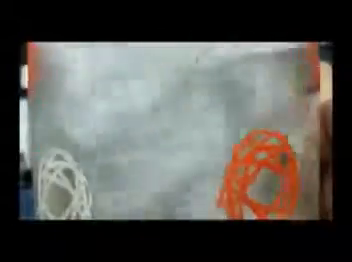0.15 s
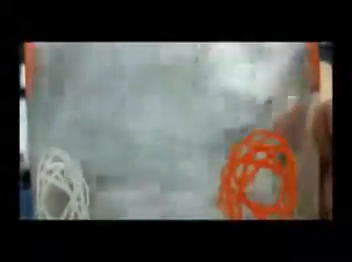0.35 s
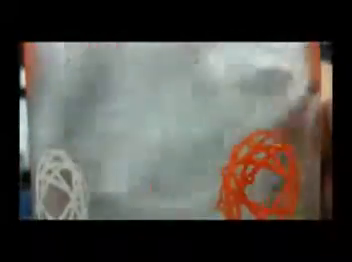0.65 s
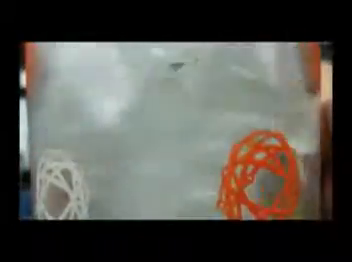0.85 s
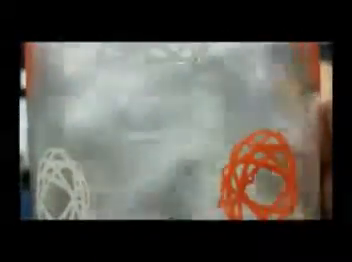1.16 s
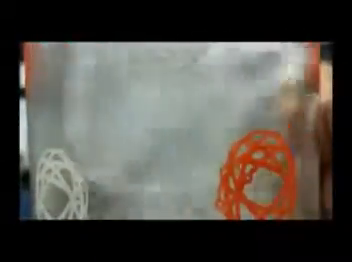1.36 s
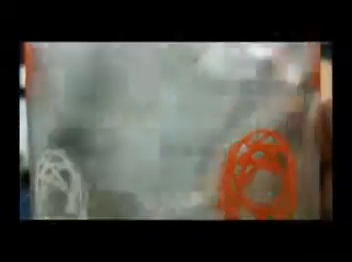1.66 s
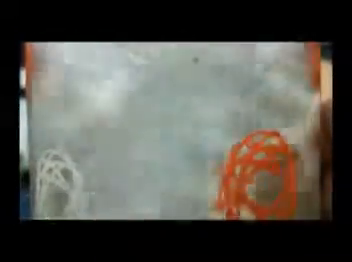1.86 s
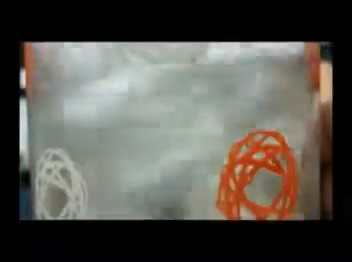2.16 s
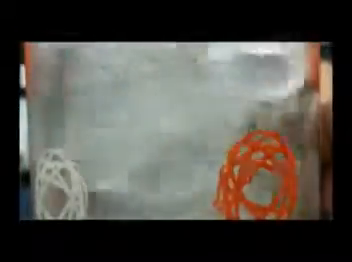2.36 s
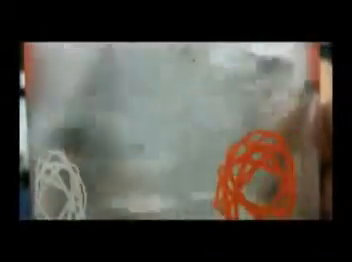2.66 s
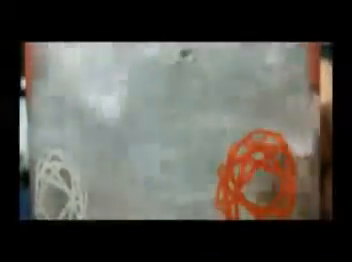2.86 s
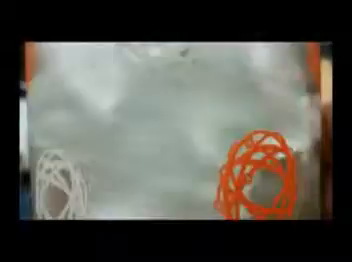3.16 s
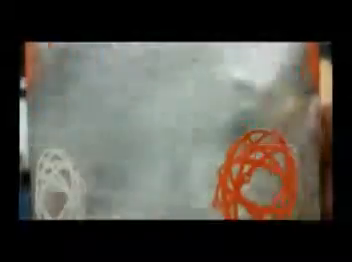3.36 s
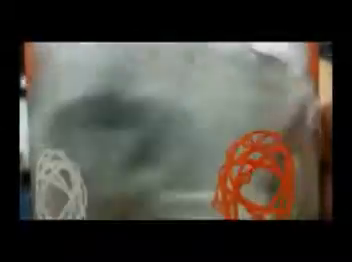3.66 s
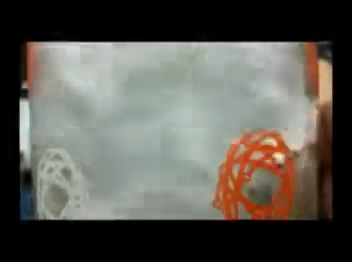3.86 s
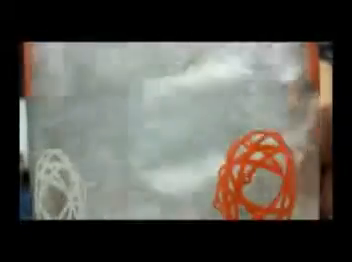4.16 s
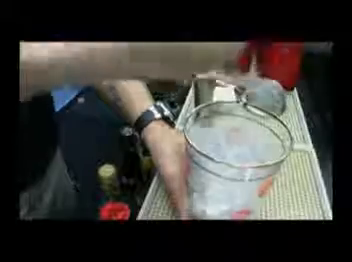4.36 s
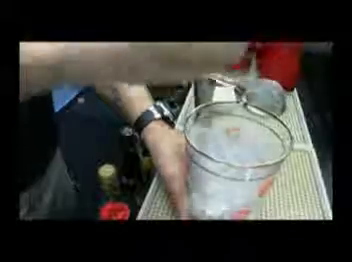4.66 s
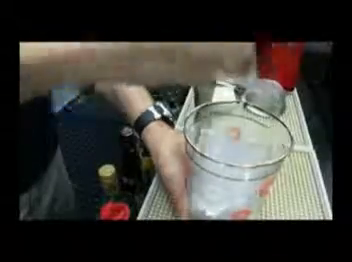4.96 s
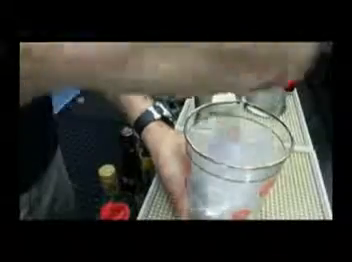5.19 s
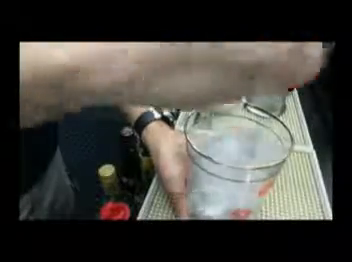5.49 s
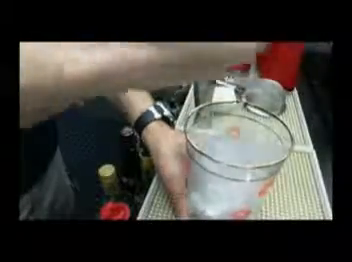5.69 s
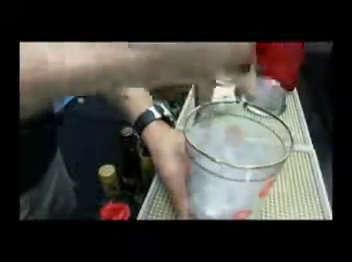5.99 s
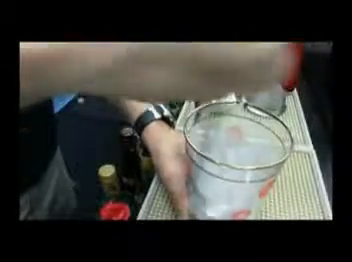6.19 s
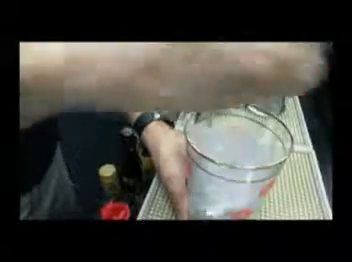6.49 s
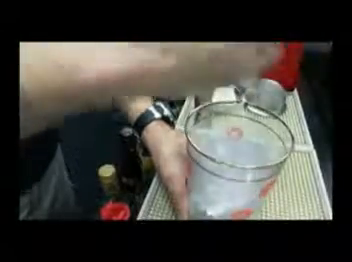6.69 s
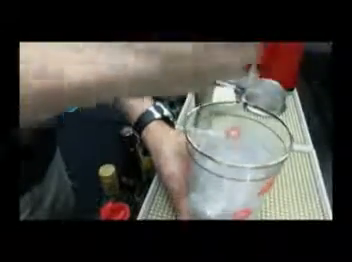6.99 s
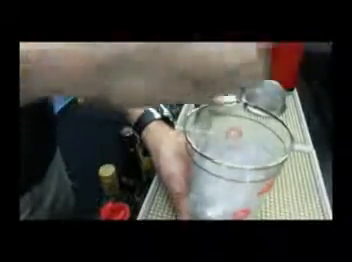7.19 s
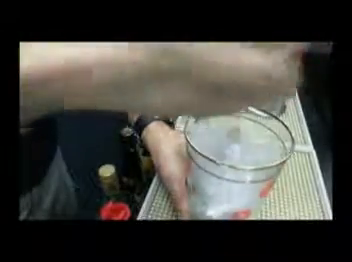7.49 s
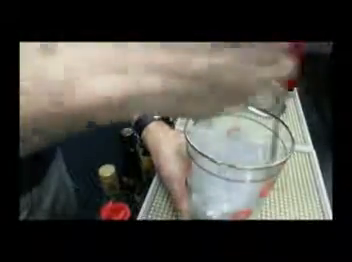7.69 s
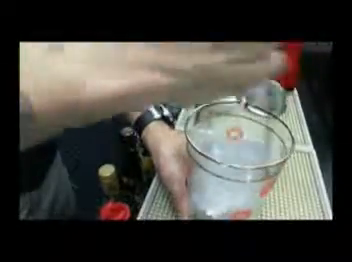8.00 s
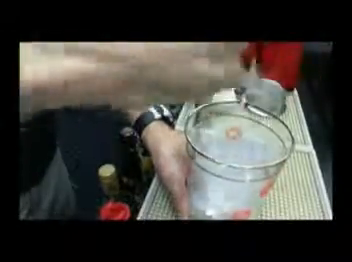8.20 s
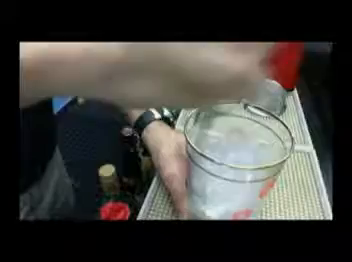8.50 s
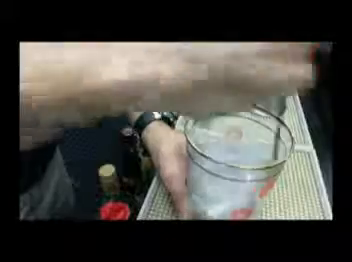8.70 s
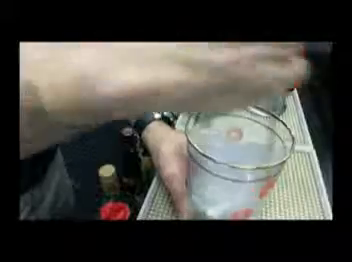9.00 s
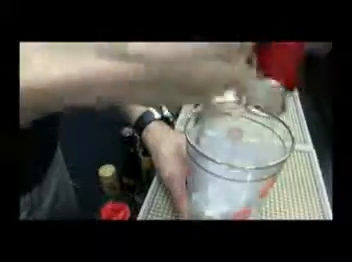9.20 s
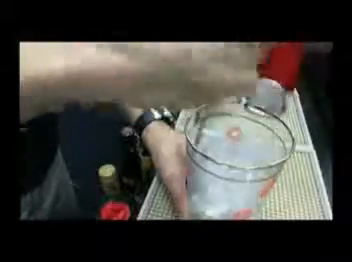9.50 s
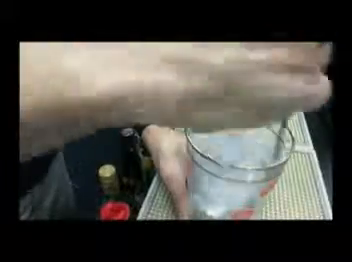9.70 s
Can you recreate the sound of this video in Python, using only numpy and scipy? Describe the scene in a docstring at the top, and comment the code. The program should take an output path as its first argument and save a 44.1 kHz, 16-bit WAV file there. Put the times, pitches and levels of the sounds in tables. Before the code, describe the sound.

A metal bar spoon stirs ice cubes in a tall mixing glass. At first the microphone is right at the glass, and the cubes knock, crack and rattle loudly in uneven surges. After a split-second gap the stirring is heard from above, softer and rounder, with a faint hollow tone from the glass and several bright rings as the spoon hits it. Quiet bar room noise and a deep hum lie behind.

```python
"""Ice cubes knock and jostle as a metal bar spoon stirs them in a tall mixing glass. Each impact excites
damped modes and drives the resonances of the glass: its air hoots and its wall rings. The glass is heard
first right at its wall, where the microphone overloads, and after a short silence from above, where the
spoon now and then strikes it and rings. Behind lie the noise of the bar and a deep hum that comes and goes.
"""
import sys
import numpy as np
from scipy import signal
from scipy.fft import rfft, irfft, next_fast_len
from scipy.io import wavfile

SR = 44100
rng = np.random.default_rng(int(sys.argv[2]) if len(sys.argv) > 2 else 0)


def materialize(psi):
    """Save the field psi as 16-bit PCM at rate SR to the path in sys.argv[1].

    A 1-D psi becomes a single channel; in a 2-D psi each row is a channel.
    """
    bounded = np.clip(np.atleast_2d(psi).T, -1, 1)
    quanta = np.round(bounded * 32767).astype(np.int16)
    wavfile.write(sys.argv[1], SR, quanta)


N = 434385
TIME = np.arange(N) / SR
NEAR_END_S, ABOVE_START_S = 4.257, 4.3155

# loud impacts of a cube on the glass: start_s, body_db, clink_db, pitch_hz
IMPACTS = [(0.014, -22, -7.5, 11000), (0.034, -11, -0.5, 2850), (0.113, -25, -9.5, 4700),
           (0.132, -19, -10, 4500), (0.171, -21, -13, 5640), (0.188, -8.5, 1, 3420), (0.198, -16, -8, 2080),
           (0.233, -27, -18.5, 2480), (0.301, -17.5, -15, 3470), (0.358, -23.5, -8, 12600),
           (0.431, -27, -11, 13000), (0.503, -13, 1.5, 11000), (0.546, -20, -4.5, 8330),
           (0.557, -25, -18, 6850), (0.693, -22.5, -6.5, 11400), (0.742, -21, -9.5, 2540),
           (0.754, -28, -5, 11500), (0.767, -23, -8, 4140), (0.782, -20.5, -14, 4700),
           (0.796, -33, -10, 4200), (0.806, -29, -14, 6100), (0.822, -19, -7.5, 5600),
           (0.836, -37, -13.5, 5360), (0.871, -19.5, -2, 6280), (0.891, -17, -17, 6900),
           (0.943, -25.5, -13.5, 3600), (1.001, -33, -14.5, 2500), (1.106, -13, -13.5, 3000),
           (1.121, -37, -22, 5530), (1.146, -18, -6, 5000), (1.217, -22.5, -5, 11100),
           (1.373, -17.5, -6, 5630), (1.446, -11, -6, 2650), (1.469, -13, -1.5, 4370),
           (1.478, -17, -5, 5700), (1.499, -14.5, -9, 4100), (1.534, -19.5, -5.5, 11150),
           (1.706, -23, -9.5, 5500), (1.715, -18.5, -12, 12900), (1.728, -17, -6.5, 2880),
           (1.739, -27, -11.5, 4360), (1.762, -19, -15, 3100), (1.811, -17.5, -12.5, 2300),
           (1.822, -20, -7, 2600), (1.861, -18, -11.5, 2670), (1.886, -39, -4.5, 2640),
           (1.895, -35, -4, 9460), (1.987, -25, -6, 11260), (2.015, -36, -9, 6000),
           (2.025, -22, -3.5, 5900), (2.039, -34, -2, 6040), (2.056, -15.5, 1, 13000),
           (2.078, -37, -19, 11600), (2.093, -39, -4, 8400), (2.127, -26, -12.5, 2030),
           (2.141, -28, -11.5, 5760), (2.151, -17, -14, 3450), (2.232, -41, -17, 6700),
           (2.309, -23, -6, 13400), (2.372, -23, 2, 8260), (2.385, -23, 2.5, 5540),
           (2.425, -43, -3.5, 9500), (2.459, -27, -12, 2500), (2.538, -22, -4, 11050),
           (2.601, -20.5, -16, 8700), (2.697, -39, -7, 7650), (2.716, -21, 2, 12500),
           (2.734, -17, -0.5, 5240), (2.764, -27, -19, 8500), (2.819, -21, -19.5, 2460),
           (2.893, -21, -25, 2060), (3.020, -27, -11.5, 9600), (3.029, -32, -10, 6700),
           (3.083, -23.5, -16.5, 11100), (3.157, -24, -9.5, 12800), (3.185, -17, -7, 6400),
           (3.194, -37, -15, 5500), (3.223, -27, -14, 7500), (3.352, -18.5, -13.5, 8600),
           (3.393, -27, -13, 8650), (3.410, -14.5, -5.5, 12400), (3.437, -31, -8.5, 4050),
           (3.503, -20, -12.5, 2230), (3.520, -21, -9.5, 5100), (3.618, -21.5, -5, 11300),
           (3.635, -43, -10, 5630), (3.647, -29, -3, 9700), (3.760, -13, -3, 1930),
           (3.777, -11.5, 0.5, 3930), (3.855, -12, 3.5, 5010), (3.911, -25, -18, 3100),
           (3.924, -21, -15, 2800), (3.934, -24, -2, 6320), (3.986, -35, -12, 9340),
           (4.034, -65, -8.5, 10300), (4.086, -28, -4, 9970), (4.095, -22, -9, 8640), (4.119, -13, 0, 5680),
           (4.135, -10.5, -0.5, 2830), (4.181, -17, -1, 12140), (4.202, -14, 1, 5050),
           (4.411, -48, -13, 11740), (4.569, -40, -17, 4400), (4.616, -26.5, -12, 3490),
           (4.674, -52, -14.5, 4540), (4.711, -28, -15.5, 8900), (4.735, -33, -17, 10900),
           (4.797, -37, -20, 4100), (4.868, -39, -18, 4800), (4.930, -44, -17, 2920),
           (4.946, -32, -33, 2800), (4.964, -29, -15, 2050), (4.982, -37, -17.5, 4730),
           (5.049, -27.5, -16.5, 2680), (5.123, -36, -13.5, 5300), (5.240, -21.5, -15.5, 4840),
           (5.254, -19.5, -15, 4600), (5.294, -35, -14, 3750), (5.345, -34, -8.5, 4420),
           (5.369, -26.5, -14, 2350), (5.409, -40, -11.5, 6500), (5.438, -41, -15.5, 2900),
           (5.466, -28, -15.5, 2800), (5.545, -34, -10.5, 4600), (5.588, -24, -12.5, 10600),
           (5.637, -45, -16.5, 6760), (5.740, -55, -16, 6170), (5.827, -32, -16.5, 11900),
           (5.947, -28, -21, 2070), (6.060, -34, -14, 6660), (6.091, -32, -10.5, 5430),
           (6.235, -23, -27, 8600), (6.319, -38, -18, 4420), (6.344, -33, -18, 5300),
           (6.411, -48, -18.5, 2745), (6.577, -21.5, -21, 2020), (6.601, -26, -21, 2780),
           (6.663, -47, -13.5, 4790), (6.748, -38, -15.5, 5400), (6.885, -29.5, -12.5, 5960),
           (7.077, -53, -14.5, 5630), (7.404, -54, -15, 5570), (7.560, -32, -40, 3700),
           (7.706, -36, -17.5, 5500), (7.939, -53, -21, 2360), (8.191, -28.5, -27, 2680),
           (8.309, -29, -27, 6600), (8.413, -34, -20, 7000), (8.828, -25.5, -24, 2420),
           (8.957, -34, -15.5, 2040), (8.994, -35, -16, 9100), (9.048, -27, -11.5, 8600),
           (9.134, -28, -56, 3200), (9.153, -25.5, -14.5, 9400), (9.304, -30, -26, 2090),
           (9.338, -32, -17.5, 7000), (9.354, -48, -16, 8300), (9.638, -55, -19, 3580),
           (9.771, -23, -6.5, 5130), (9.813, -19.5, -19, 5500)]
# spectrum of the ice from above: frequency_hz, level_db
ICE_SPECTRUM_ABOVE = [(100, -1.5), (400, -7.5), (900, -1), (1450, 6.5), (1850, -5), (2400, 12), (3500, 4),
                      (4700, 11), (6700, 5.5), (8200, 11), (10000, 2), (11500, 6.5), (13500, 2),
                      (15500, -21)]


def gain_of(db):
    """Decibels to amplitude ratio."""
    return 10 ** (np.asarray(db) / 20)


def unit_rms(x):
    """Normalisation to an rms of one."""
    return x / np.sqrt(np.mean(x ** 2) + 1e-20)


def value_at(points, hz):
    """Interpolation on a log-frequency axis."""
    f, value = np.transpose(points)
    return np.interp(np.log(hz + 1), np.log(f + 1), value)


def add(mix, start_s, sound):
    """Superposition of a sound on the mix."""
    part = mix[max(round(start_s * SR), 0):][:len(sound)]
    part += sound[:len(part)]


def coloured_noise(spectrum, length=N):
    """Spectral shaping of white noise, at an rms of one."""
    size = next_fast_len(length, True)
    gain = gain_of(value_at(spectrum, np.fft.rfftfreq(size, 1 / SR)))
    return unit_rms(irfft(rfft(rng.standard_normal(length), size) * gain, size)[:length])


def drift(rate_hz):
    """Low-pass noise for slow random modulation."""
    return coloured_noise([(rate_hz / 2, 0), (rate_hz, -6), (10 * rate_hz, -80), (20 * rate_hz, -140)])


def hum(pitch_hz=33.2, waver=0.033, unsteady_db=1.5, rest_db=-43, fade_s=0.068):
    """A deep tone, slightly modulated in amplitude and frequency, swells for a spell and sinks back."""
    # spells of hum: start_s, end_s, level_db
    spells = [(0, 4.85, -33.5), (5.301, 6.35, -28), (6.3, 7.05, -38), (8.13, 9.5, -30.5)]
    swell = sum(gain_of(db) * np.clip(np.minimum(TIME - start, end - TIME) / fade_s, 0, 1)
                for start, end, db in spells)
    envelope = np.maximum(swell, gain_of(rest_db)) * gain_of(unsteady_db * drift(2.5))
    hz = pitch_hz * (1 + waver * drift(3.5))
    return envelope * np.sin(2 * np.pi * np.cumsum(hz) / SR)


def room(x, wet_db, bass_db):
    """Reverberation: sparse reflections from counter and walls, each band decaying at its own rate."""
    # reverberation time: frequency_hz, t60_s
    decay_times = [(200, 0.17), (1000, 0.083), (3000, 0.22), (7000, 0.12), (15000, 0.5)]
    echoes = rng.standard_normal(SR // 2) * (rng.random(SR // 2) < .15)
    echoes[:SR // 250] = 0  # 4 ms before the first reflection
    hz, t, bands = signal.stft(echoes, SR, nperseg=256)
    tilt_db = value_at([(800, bass_db), (5000, 0)], hz)[:, None]
    decay_db = 60 * t / value_at(decay_times, hz)[:, None]
    tail = signal.istft(bands * gain_of(tilt_db - decay_db), SR, nperseg=256)[1]
    return x + gain_of(wet_db) * signal.fftconvolve(x, tail / np.linalg.norm(tail))[:N]


def stirring(rise_s=0.0098, settle_db_per_s=60):
    """Envelope of the sliding cubes: strokes rise fast, hold, decay slowly, and add in power."""
    # pushes of the spoon: start_s, length_s, level_db
    strokes = [(0.0, 0.037, -24.5), (0.168, .12, -28.5), (0.34, .09, -27), (0.47, 0.025, -23.5),
               (0.71, 0.043, -26), (1.017, 0.031, -21.5), (1.417, 0.21, -29.5), (1.69, 0.34, -25.5),
               (2.01, 0.13, -25.5), (2.357, 0.23, -27), (2.694, 0.068, -26), (3.128, .06, -23),
               (3.347, 0.13, -26.5), (3.614, 0.063, -28), (3.71, 0.067, -25.5), (3.845, 0.07, -28),
               (4.077, 0.18, -30), (4.555, 0.26, -37.5), (4.913, 0.076, -31), (5.23, 0.11, -34),
               (5.546, 0.34, -40), (5.847, 0.033, -38.5), (6.189, 0.26, -37.5), (6.504, 0.066, -34),
               (6.842, 0.21, -38.5), (6.998, 0.039, -56), (7.162, 0.21, -38), (7.434, 0.14, -37.5),
               (7.794, 0.039, -37.5), (8, 0.046, -42), (8.128, 0.041, -34.5), (8.479, 0.11, -37),
               (8.813, 0.12, -36.5), (8.921, 0.044, -36), (9.13, 0.16, -35.5), (9.58, 0.061, -34.5),
               (9.78, .06, -34)]
    power, t = np.zeros(N), np.arange(SR) / SR
    for start, length, db in strokes:
        decay_db = settle_db_per_s * np.maximum(t - length, 0)
        add(power, start, (np.minimum(t / rise_s, 1) * gain_of(db - decay_db)) ** 2)
    return np.sqrt(power)


def glass_resonance(contacts, modes, knock_db, rub_db, wander=0.012):
    """Resonance: impacts and friction make the air hoot and the wall ring, at slightly drifting pitch."""
    friction = stirring() * coloured_noise([(700, 5.5), (2500, -7.5)])
    drive = gain_of(knock_db) * contacts + gain_of(rub_db) * friction
    warped_time = np.cumsum(1 + wander * drift(8.2)) / SR
    out = contacts.copy()
    for hz, width_hz, db in modes:
        carrier = np.exp(2j * np.pi * hz * warped_time)
        r = np.exp(-np.pi * width_hz / SR)
        out += gain_of(db) * 2 * (carrier * signal.lfilter([1 - r], [1, -r], drive / carrier)).real
    return out


def glass_wall(ice, ring_db):
    """Forced vibration: the wall rings briefly at every contact, damped by hand and drink."""
    # modes of the filled glass: frequency_hz, bandwidth_hz, gain_db
    wall_modes = [(2013, 13, 4), (2394, 33, -1.5), (5780, 130, -16.5)]
    out = ice.copy()
    for hz, width_hz, db in wall_modes:
        r = np.exp(-np.pi * width_hz / SR)
        pole = r * np.exp(2j * np.pi * hz / SR)
        out += gain_of(db + ring_db) * 2 * signal.lfilter([1 - r], [1, -pole], ice).real
    return out


def contact(spectrum, low_hz, high_hz, t60, rise_s=0.0006, centre_hz=1000, slope_db=0, count=14):
    """Free decay of random modes in a band, slope_db weaker for each octave from the centre."""
    t = np.arange(2000, dtype=np.float32) / SR
    hz = low_hz + (high_hz - low_hz) * (np.arange(count) + rng.random(count)) / count
    mode_db = value_at(spectrum, hz) - slope_db * abs(np.log2(hz / centre_hz))
    amplitude = gain_of(mode_db + 4 * rng.standard_normal(count))
    phase = np.outer(np.float32(2 * np.pi * hz), t) + np.float32(2 * np.pi * rng.random((count, 1)))
    ring = np.float32(amplitude) @ np.sin(phase) * gain_of(-60 * t / t60) * (1 - np.exp(-t / rise_s))
    return ring / np.sqrt(np.sum(ring ** 2) / (.006 * SR))  # the energy of 6 ms at full level


def spoon(chatter_s=0.0092, rise_s=0.00051, shimmer_t60=0.51, split=0.036, count=6):
    """Impact excitation: metal chatters on glass, then a dense shimmer and clusters of modes decay."""
    # blows on the glass: start_s, blow_db, ring_db, brightness_db_per_octave
    blows = [(4.316, -39, -20, -7.5), (5.0343, -4.5, -26, -3.5), (5.6847, -8.5, -27.5, -5),
             (5.9993, -13, -42, -6.5), (6.990, -10.5, -33, -4.5), (8.4967, -14.5, -36, -1),
             (9.4759, -6.5, -23.5, -1)]
    # strongest modes of spoon and glass: frequency_hz, level_db, t60_s
    ringing_modes = [(4250, -33, 0.23), (4970, -9, 0.43), (4930, 2, .4), (5370, 5, 0.37), (6100, -9, .42),
                     (7040, 30, 0.63), (9100, -13, 0.27), (11400, -6, 0.35)]
    # spectrum of chatter and shimmer: frequency_hz, level_db
    chatter_spectrum = [(500, -41), (3300, -16), (4700, 3.5), (6000, 0), (6700, -5), (8000, 6), (10000, 0),
                        (12000, 4.5), (15500, -16)]
    out, t = np.zeros(N), np.arange(SR // 2) / SR
    mode_hz, mode_db, t60 = np.transpose(ringing_modes)
    decay = gain_of(-60 * t / t60[:, None])
    for start, blow_db, ring_db, brightness in blows:
        hz = mode_hz[:, None] * (1 + split * rng.uniform(-1.3, 1, (len(mode_hz), count)))
        tilt_db = brightness * np.log2(hz / hz.mean())
        amplitude = gain_of(mode_db[:, None] + tilt_db + 3 * rng.standard_normal(hz.shape))
        waves = np.sin(np.float32(2 * np.pi * (hz[..., None] * t + rng.random(hz.shape)[..., None])))
        clusters = np.einsum("mk,mkt->mt", np.float32(amplitude), waves)
        modes = (clusters * decay).sum(0) / np.sqrt((amplitude ** 2).sum() / 2)
        noise = coloured_noise([(f, db + brightness * np.log2(f)) for f, db in chatter_spectrum], len(t))
        chatter = gain_of(blow_db) * noise * np.exp(-(t / chatter_s) ** 3)
        shimmer = gain_of(-1 - 60 * t / shimmer_t60) * noise
        ring = gain_of(ring_db) * (gain_of(-6) * modes + shimmer)
        body = gain_of(blow_db - 14) * contact(ICE_SPECTRUM_ABOVE, 380, 2508, t60=0.042)
        add(out, start, (chatter + ring) * (1 - np.exp(-t / rise_s)))
        add(out, start, body)
    return out


def jostle(ice, spectrum, tick_db, bump_db, settle_db, per_s, settle_s=0.012, bands=14):
    """Poisson process of tiny contacts: cubes tick and bump as they slide, and settle after knocks."""
    ticks, bumps = np.zeros(N), np.zeros(N)
    low_hz, split_hz, top_hz = 350, 2200, 15000
    for hz in np.geomspace(split_hz, top_hz, bands):
        strength = gain_of(5 * np.minimum(rng.exponential(1, N), 3))
        impulses = strength * (rng.random(N) < per_s / bands / SR)
        tick = contact(spectrum, split_hz, top_hz, t60=0.019, centre_hz=hz, slope_db=16, count=40)
        bump = contact(spectrum, low_hz, split_hz, t60=0.016, count=12)
        ticks += signal.oaconvolve(impulses, tick * gain_of(value_at(spectrum, hz)) * np.sqrt(hz))[:N]
        bumps += signal.oaconvolve(impulses, bump)[:N]
    r = np.exp(-1 / (settle_s * SR))
    settling = gain_of(settle_db) * signal.lfilter([1 - r], [1, -r], abs(ice))
    rattle = gain_of(tick_db) * unit_rms(ticks) + gain_of(bump_db) * unit_rms(bumps)
    return (stirring() + settling) * rattle


def nudges(start_s, end_s, per_s, body_db, clink_db, uneven_db, low_hz=1847, high_hz=8890, count=200):
    """Jittered pulse train: rows of lesser impacts, as strong as the stirring is at that moment."""
    jitter, pitch = rng.random((2, count))
    body_scatter, clink_scatter = uneven_db * rng.uniform(-1, 1, (2, count))
    times = start_s + (np.arange(count) + jitter) / per_s
    stir_db = 20 * np.log10(np.interp(times, TIME, stirring()) + 1e-6)
    hz = low_hz * (high_hz / low_hz) ** pitch
    rows = zip(times, stir_db + body_db + body_scatter, stir_db + clink_db + clink_scatter, hz)
    return [row for row in rows if row[0] < end_s]


def rebounds(impacts, after_s, loss_db):
    """Inelastic collision: each knocked cube strikes a neighbour a moment later, more softly."""
    chance = rng.uniform(.5, 1.5, (len(impacts), 3))
    return [(start + after_s * late, body + loss_db * soft, clink + loss_db * soft, hz * np.sqrt(detune))
            for (start, body, clink, hz), (late, soft, detune) in zip(impacts, chance)]


def knocks(impacts, spectrum, thud_db, thud_t60, body_t60,
           crack_db, crack_t60, ping_db, ping_t60, slope_db):
    """Modal superposition: a cube's impact is a thud, a hollow body, a wide crack and its own ping."""
    out = np.zeros(N)
    for start, body_db, clink_db, hz in impacts:
        loose = np.exp(0.4 * rng.standard_normal())  # a loose cube rings longer
        thud = contact(spectrum, 70, 400, thud_t60, rise_s=0.0011, count=6)
        body = contact(spectrum, 400, 2000, body_t60, rise_s=0.0005, count=16)
        crack = contact(spectrum, 2000, 15500, crack_t60 * loose,
                        centre_hz=hz, slope_db=slope_db, count=48)
        ping = contact(spectrum, hz / 1.07, hz * 1.07, ping_t60 * loose, count=5)
        add(out, start, gain_of(body_db) * (gain_of(thud_db) * thud + body))
        add(out, start, gain_of(clink_db) * (gain_of(crack_db) * crack + gain_of(ping_db) * ping))
    return out


def glass_near():
    """Direct sound dominates at the wall of the glass: hard, loud knocks with rounder ones between."""
    # spectrum of the ice at the wall: frequency_hz, level_db
    spectrum = [(100, 7.5), (400, 1.5), (900, 6), (1700, 1.5), (2600, 6.5), (3500, -1.5), (4600, 9),
                (5600, 10.5), (7000, 4.5), (8700, 10.5), (10000, 2.5), (11800, 11), (13500, 1.5),
                (15500, -9)]
    # low hoot of the air in the glass and higher ring of its wall: frequency_hz, bandwidth_hz, gain_db
    resonances = [(622, 33, 7.5), (2060, 6.9, -1.5), (2530, 67, -12)]
    # steady noise of the bar: frequency_hz, density_db
    bar_spectrum = [(20, -40), (45, -0.5), (120, -6), (250, -8), (480, -12.5), (620, -8.5), (780, -18.5),
                    (2500, -25), (13500, -24), (15500, -66)]
    loud = [row for row in IMPACTS if row[0] < NEAR_END_S]
    loud += rebounds(loud, after_s=.015, loss_db=-19)
    lesser = nudges(0, NEAR_END_S, per_s=38, body_db=-1.5, clink_db=1, uneven_db=5.5)
    ice = knocks(loud, spectrum, thud_db=-6, thud_t60=0.048, body_t60=0.034,
                 crack_db=-2, crack_t60=0.023, ping_db=-11, ping_t60=0.02, slope_db=3)
    ice += knocks(lesser, spectrum, thud_db=-4, thud_t60=0.06, body_t60=0.033,
                  crack_db=-1, crack_t60=0.013, ping_db=-3, ping_t60=0.036, slope_db=4)
    ice += jostle(ice, spectrum, tick_db=-7.5, bump_db=-14, settle_db=-1, per_s=420)
    bar = gain_of(-31.5) * coloured_noise(bar_spectrum)
    glass = glass_resonance(glass_wall(ice, ring_db=-2.5), resonances, knock_db=2, rub_db=2)
    return room(glass, wet_db=-16.5, bass_db=-1) + bar


def glass_above():
    """Reverberant sound counts for more above the rim: softer, rounder clinks and the ringing spoon."""
    # low hoot of the air in the glass and higher ring of its wall: frequency_hz, bandwidth_hz, gain_db
    resonances = [(609, 35.3, 18.5), (1464, 89, -5.5), (2330, 19, -15)]
    # steady noise of the bar: frequency_hz, density_db
    bar_spectrum = [(20, 6), (50, 4), (90, -1), (170, 4), (300, 0), (490, -8.5), (610, -6.5), (780, -10),
                    (2500, -20.5), (8000, -16.5), (13500, -20), (15500, -55)]
    loud = [row for row in IMPACTS if row[0] > NEAR_END_S]
    loud += rebounds(loud, after_s=0.0068, loss_db=-20.5)
    lesser = nudges(ABOVE_START_S, N / SR, per_s=26, body_db=-2.5, clink_db=4.5, uneven_db=2.5)
    ice = knocks(loud, ICE_SPECTRUM_ABOVE, thud_db=-5, thud_t60=0.06, body_t60=0.028,
                 crack_db=-5, crack_t60=0.026, ping_db=-9.5, ping_t60=0.015, slope_db=3)
    ice += knocks(lesser, ICE_SPECTRUM_ABOVE, thud_db=-5, thud_t60=0.056, body_t60=0.04,
                  crack_db=-2.5, crack_t60=0.02, ping_db=-3, ping_t60=0.026, slope_db=4)
    ice += jostle(ice, ICE_SPECTRUM_ABOVE, tick_db=1.5, bump_db=-4.5, settle_db=-43, per_s=110)
    bar = gain_of(-35.5) * coloured_noise(bar_spectrum)
    glass = glass_resonance(glass_wall(ice, ring_db=-5) + spoon(), resonances, knock_db=1, rub_db=-7)
    return room(glass, wet_db=-8, bass_db=4.5) + bar


def scene():
    """Diotic sound, the same in both ears: the two listening positions in turn, over the hum."""
    mono = np.where(TIME < NEAR_END_S, glass_near(), glass_above()) + hum()
    return np.array([mono, mono])


def record(dry, offset=-0.086, limit=0.8, cutoff_hz=15700):
    """Asymmetric clipping from a DC offset, silence between the two positions, then a low-pass."""
    audible = (TIME < NEAR_END_S) | (TIME > ABOVE_START_S)
    clipped = np.clip(dry + offset, -limit, limit) * audible
    lowpass = signal.firwin(255, cutoff_hz, window=("kaiser", 8), fs=SR)
    return signal.oaconvolve(clipped, lowpass[None], "same", axes=1)


dry = scene()
out = record(dry)
materialize(out)
```